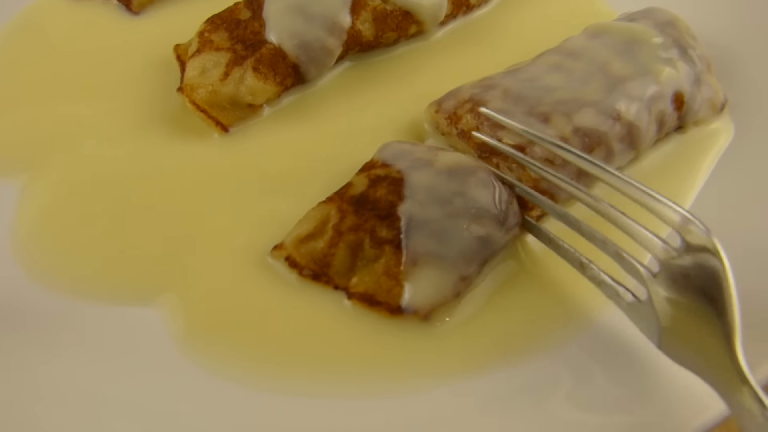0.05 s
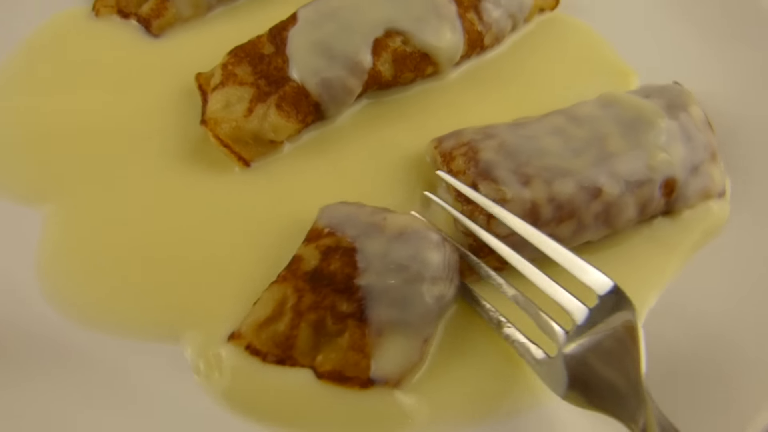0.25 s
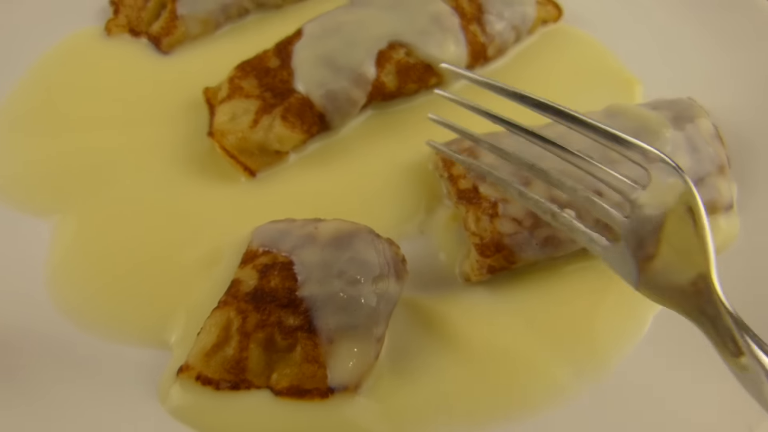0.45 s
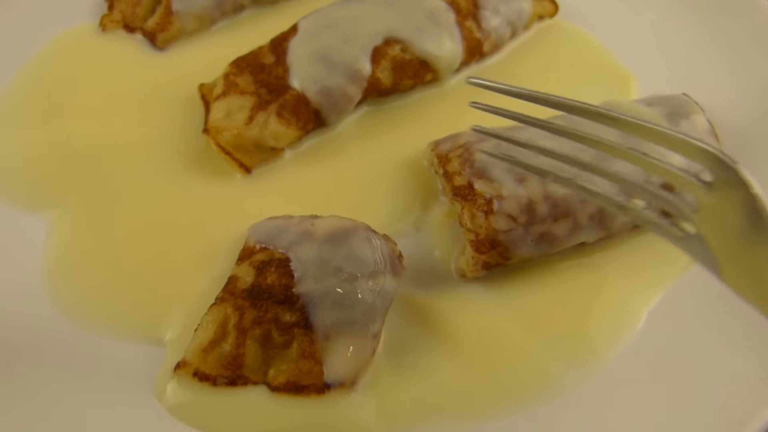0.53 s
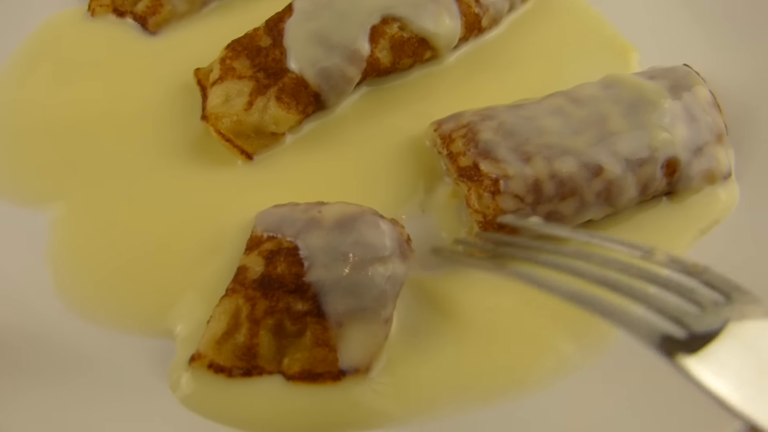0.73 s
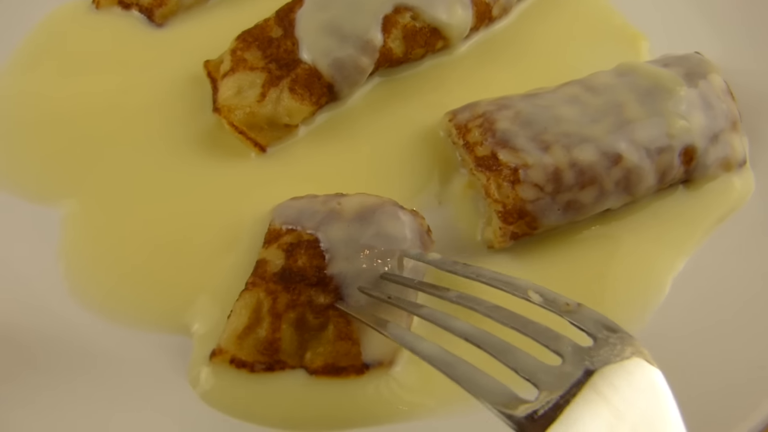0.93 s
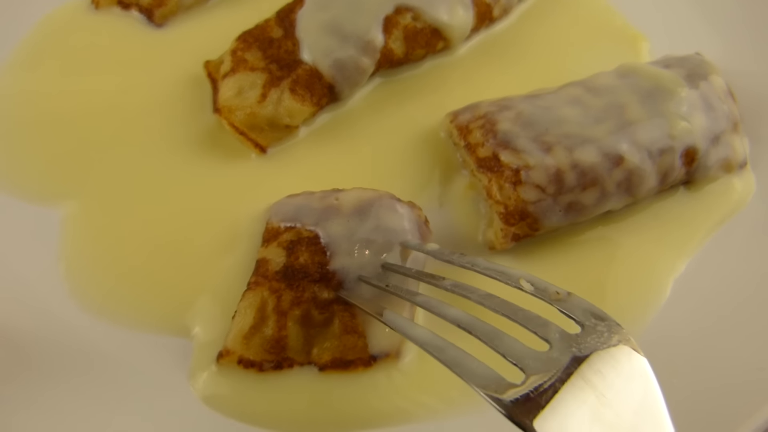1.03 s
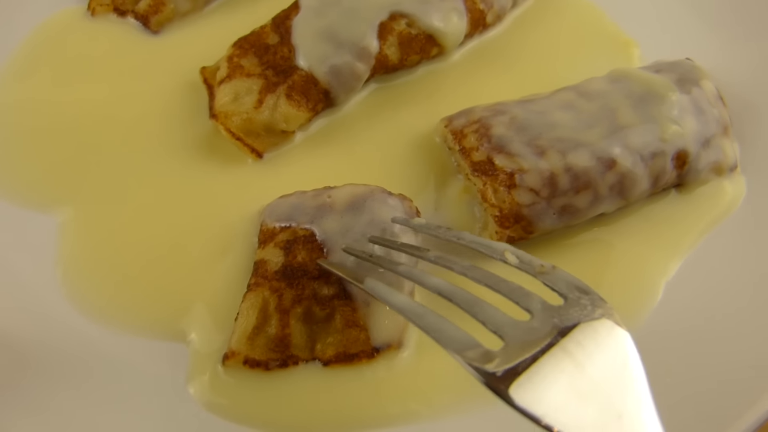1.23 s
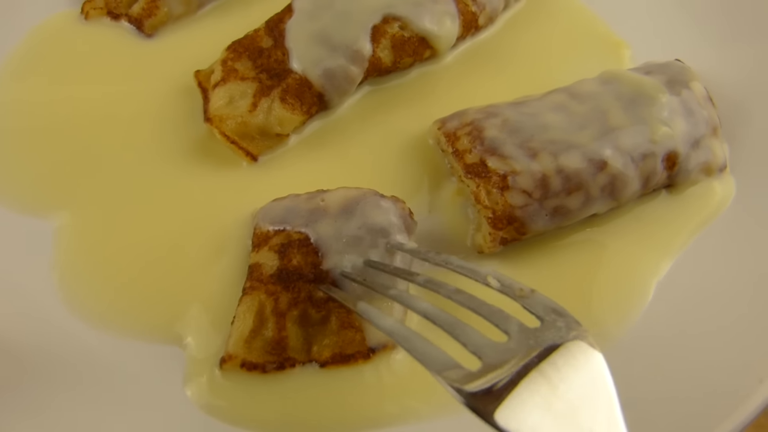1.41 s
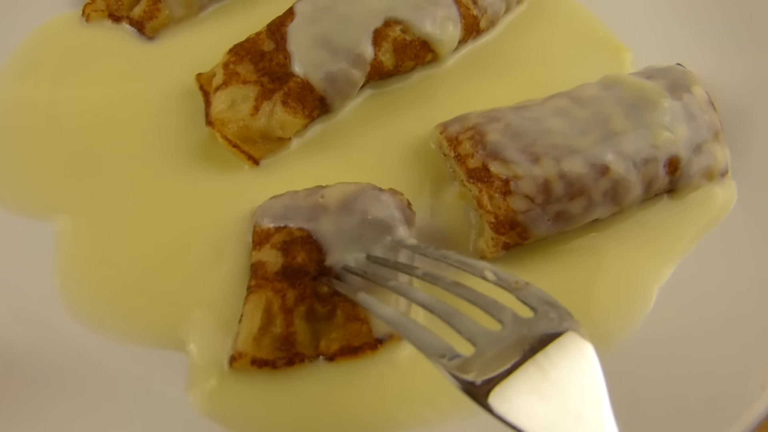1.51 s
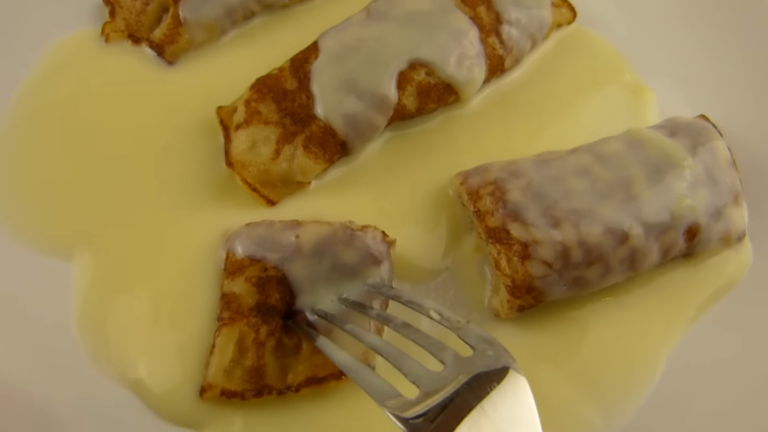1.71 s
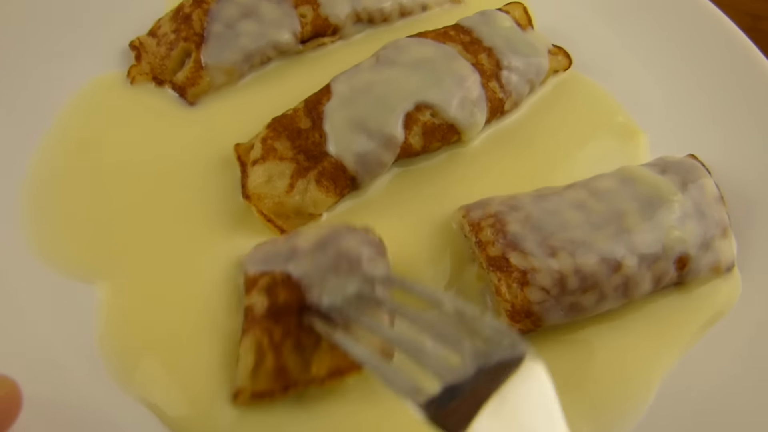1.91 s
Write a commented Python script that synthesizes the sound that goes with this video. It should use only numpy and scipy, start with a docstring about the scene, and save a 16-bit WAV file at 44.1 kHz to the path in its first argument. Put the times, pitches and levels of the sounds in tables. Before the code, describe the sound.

A metal fork clinks once, sharp and bright, on a food-damped china plate, then scrapes softly

```python
"""A metal fork cuts a soft pancake and clinks once on a china plate damped by food and sauce:
cracks of noise and short-lived ringing tones, with a dull knock of plate on table. It scrapes softly
as it lifts: tiny slips and thin squeals. A low hum, there throughout, swells midway and fades. Later the
fork presses into the soft piece with a few tiny wet ticks, short bursts of noise. A small room of
echoes and fading noise rings behind it all, over steady noise and a faint flutter of pips."""
import sys
import numpy as np
from scipy import signal
from scipy.fft import rfft, irfft
from scipy.io import wavfile
from scipy.ndimage import uniform_filter1d

SR = 44100
rng = np.random.default_rng(int(sys.argv[2]) if len(sys.argv) > 2 else 0)


def master(y):
    """Save y as 16-bit WAV."""
    cut = np.clip(np.atleast_2d(y).T, -1, 1)
    pcm = np.round(cut * 32767)  # scale
    wavfile.write(sys.argv[1], SR, pcm.astype(np.int16))


N = 85995  # length in samples


def amp(db):
    """Turns decibels into gain."""
    return 10 ** (np.asarray(db) / 20)


def unit(x):
    """Scales a sound to an average (rms) level of 1."""
    return x / np.sqrt(np.mean(x ** 2) + 1e-20)


def read(points, hz):
    """Reads a table between its points, on a log-frequency axis."""
    f, value = np.transpose(points)
    return np.interp(np.log(hz + 1), np.log(f + 1), value)


def add(mix, start_s, sound):
    """Mixes a sound in at a time, cutting off what runs past the end."""
    start = max(round(start_s * SR), 0)
    part = mix[..., start:][..., :sound.shape[-1]]
    part += sound[..., :part.shape[-1]]


def colour(x, points):
    """Gives a sound the tabled spectrum, with a filter of unit energy that never acts early."""
    size = 4096
    log_gain = np.log(amp(read(points, abs(np.fft.fftfreq(size, 1 / SR)))))
    # minimum phase: the filter's energy comes as early as it can
    spectrum = np.exp(np.conj(signal.hilbert(log_gain)))
    taps = np.fft.ifft(spectrum).real[:size // 2]
    return signal.fftconvolve(x, taps / np.linalg.norm(taps))[:len(x)]


def band_noise(hz, octaves):
    """Makes noise in a bell-shaped band around a centre pitch."""
    f = np.fft.rfftfreq(N, 1 / SR)
    bell = np.exp(-.5 * (np.log2((f + 1) / hz) / octaves) ** 2)
    return unit(irfft(rfft(rng.standard_normal(N)) * bell, N))


def dying(t60):
    """Fades exponentially, by 60 dB in t60 seconds."""
    return np.exp(-np.log(1000) * np.arange(N) / SR / t60)


def pair(a, b, likeness):
    """Makes two channels of the given likeness from two unrelated signals."""
    c = np.clip(likeness, -1, 1)
    mid = np.sqrt((1 + c) / 2) * a
    side = np.sqrt((1 - c) / 2) * b
    return np.array([mid + side, mid - side])


# how alike left and right are in scattered sound: pitch_hz, likeness (0 unrelated, 1 the same)
SCATTER_LIKENESS = [(200, 0.018), (700, 0.9), (1500, 0.25), (3000, 0.31), (5000, 0.87), (12000, .85)]


def scattered(size):
    """Makes stereo noise whose left-right likeness depends on pitch."""
    z = rfft(rng.standard_normal((2, size)))
    return irfft(pair(*z, read(SCATTER_LIKENESS, np.fft.rfftfreq(size, 1 / SR))), size)


RADIATE_HZ = 350.8  # the plate sends out little sound below this


def radiate(x):
    """Thins out the lows that the plate sends out poorly."""
    return signal.sosfilt(signal.butter(2, RADIATE_HZ, "high", fs=SR, output="sos"), x)


# plate and fork ringing together: pitch_hz, level_db (relative to the blow), t60_s
RINGING_TONES = [(1080, -26, .055), (1210, -23, .035), (1720, -21, .028), (1927, -34, .1),
                 (2520, -24, .033), (3537, -22.5, .115), (4050, -29, .07), (4545, -12.5, .07),
                 (4960, -19, .04), (5340, -7, .015), (5583, -11, .07), (6710, -13.5, .075),
                 (6912, -18, .06), (7885, -18, .052), (9245, -12, .03), (10615, -17, .05),
                 (12100, -23, .033)]
# tines landing on the plate: start_s, level_db
TINE_BLOWS = [(.2180, -4.5), (0.2186, -3)]
# colour of the contact noise: pitch_hz, level_db (relative)
CRACK_COLOUR = [(40, -54), (150, -27.5), (350, -17), (700, -7.5), (1200, -3.5), (1700, -0.5), (2200, -7.5),
                (3000, -5.5), (3700, 1.5), (4400, -5), (5500, 6.5), (6300, -2), (7300, -15.5), (8100, 1.5),
                (9700, -2), (11500, -12.5), (15500, -22.5)]
CRACK_DB, CRACK_T60_S = -6.5, 0.02  # level relative to the blow
PHASE_SPREAD_TURNS = 0.039  # left-right offset of each ringing tone, in cycles


def clink():
    """Tines crack against the china, and the hardest one rings the plate in many damped tones."""
    t = np.arange(N) / SR
    out = np.zeros((2, N))
    for start_s, level_db in TINE_BLOWS:
        burst = scattered(N) * dying(CRACK_T60_S)
        crack = np.array([colour(side, CRACK_COLOUR) for side in burst])
        add(out, start_s, amp(level_db + CRACK_DB) * crack)

    start_s, blow_db = TINE_BLOWS[-1]  # the hardest blow
    for hz, level_db, t60 in RINGING_TONES:
        offset = PHASE_SPREAD_TURNS * rng.choice([-1, 1]) * np.array([[.5], [-.5]])
        turns = rng.random() + offset
        tone = dying(t60) * np.sin(2 * np.pi * (hz * t + turns))
        add(out, start_s, amp(blow_db + level_db) * tone)
    return radiate(out)


# plate against the table: pitch_hz, level_db, t60_s
TABLE_KNOCK = [(500, -21, .012), (720, -19, .012)]
KNOCK_PAN_DB, KNOCK_LAG_S = -7.5, .0003  # left compared with right


def knock():
    """The blow pushes the plate against the table: a short dull knock, nearer the right ear."""
    t = np.arange(N) / SR
    push = np.zeros(N)
    for k, (hz, level_db, t60) in enumerate(TABLE_KNOCK):
        # the tones start half a cycle apart
        push += amp(level_db) * dying(t60) * np.sin(2 * np.pi * (hz * t + k / 2))
    push = radiate(push)
    out = np.zeros((2, N))
    start_s = TINE_BLOWS[0][0]
    add(out[0], start_s + KNOCK_LAG_S, amp(KNOCK_PAN_DB / 2) * push)
    add(out[1], start_s, amp(-KNOCK_PAN_DB / 2) * push)
    return out


# tines sliding on the sauced plate:
# middle_s, half_length_s, slip_level_db, squeal_pitch_hz, squeal_level_db
SLIDES = [(0.283, 0.019, -51.5, 4370, -34.5), (0.338, 0.042, -52, 5620, -47),
          (0.353, 0.027, -78, 4530, -45), (0.41, 0.04, -56.5, 4800, -66),
          (0.438, 0.031, -55.5, 5080, -53.5), (0.476, 0.014, -59, 5400, -81)]
# colour of the slips: pitch_hz, level_db (relative)
SLIP_COLOUR = [(200, -29.5), (1000, -2.5), (2200, -2.5), (3200, -2), (5000, -2.5), (7500, 1), (10500, -2.5),
               (12000, -15), (15500, -22)]
SLIPS_PER_S, SQUEAL_WIDTH_HZ = 3300, 270  # average slip rate, nominal squeal width


def scrapes():
    """Dense tiny slips and a thin squeal swell and fade with each slide."""
    t = np.arange(N) / SR
    out = np.zeros(N)
    for middle_s, half_s, slip_db, squeal_hz, squeal_db in SLIDES:
        impulses = rng.standard_normal(N) * (rng.random(N) < SLIPS_PER_S / SR)
        slips = unit(colour(impulses, SLIP_COLOUR))
        squeal = band_noise(squeal_hz, SQUEAL_WIDTH_HZ / squeal_hz / 2)
        stroke = np.cos(np.pi / 2 * np.clip((t - middle_s) / half_s, -1, 1)) ** 2
        out += stroke * (amp(slip_db) * slips + amp(squeal_db) * squeal)
    return np.array([out, out])


# wet ticks as the fork presses in, before their treble is softened:
# start_s, level_db, centre_hz, spread_octaves, t60_s
WET_TICKS = [(1.6637, -46, 5790, 1, 0.0059), (1.6678, -44.5, 7200, 0.92, 0.012),
             (1.6722, -48, 1820, 0.57, 0.018), (1.6815, -62, 5300, 0.046, 0.061),
             (1.682, -54, 2100, 0.42, 0.013), (1.7084, -54, 5330, 0.58, 0.0091),
             (1.7176, -54, 5200, .6, 0.0085), (1.7283, -53.5, 5500, 0.62, 0.021)]
TICK_TOP_HZ = 9100


def ticks():
    """Small films of sauce snap under the tines: bursts of noise with a softened treble."""
    out = np.zeros((2, N))
    for start_s, level_db, hz, octaves, t60 in WET_TICKS:
        add(out, start_s, amp(level_db) * band_noise(hz, octaves) * dying(t60))
    return signal.sosfilt(signal.butter(2, TICK_TOP_HZ, fs=SR, output="sos"), out)


# nearby surfaces: delay_s, gain_db
NEAR_ECHOES = [(.0045, -15.5), (.0098, -17.5)]
# how fast the room dies away: pitch_hz, t60_s
ROOM_DECAY = [(200, .24), (700, 0.51), (1800, .44), (4500, 0.46), (8000, .35), (13000, 0.15)]
TAIL_DELAY_S = .009


def room(x, wet_db):
    """Adds a few near reflections and a diffuse tail whose bands die at their own speed."""
    hz, t, z = signal.stft(scattered(SR), SR, nperseg=256)
    decay = np.exp(-np.log(1000) * t / read(ROOM_DECAY, hz)[:, None])
    tail = signal.istft(z * decay, SR, nperseg=256)[1]
    response = np.zeros((2, SR))
    add(response, TAIL_DELAY_S, amp(wet_db) * tail / np.linalg.norm(tail[0]))
    response[:, 0] += 1  # the direct sound
    for delay_s, gain_db in NEAR_ECHOES:
        scatter = scattered(64) * np.hanning(64)
        add(response, delay_s, amp(gain_db) * scatter / np.linalg.norm(scatter[0]))
    return signal.fftconvolve(x, response, axes=1)[:, :N]


# colour of the room noise: pitch_hz, level_db (per Hz, relative)
AIR_COLOUR = [(15, -42.5), (25, -13), (70, -12), (148, -9.5), (269, -12.5), (299, -7), (392, -13),
              (691, -13), (1390, -16.5), (1640, -15.5), (2150, -22), (9990, -22), (15800, -32.5)]
# stereo width of the room noise: pitch_hz, side_over_middle_db
AIR_SIDES = [(50, -9), (150, -0.5), (300, 7), (550, 10.5), (1000, 6), (1700, 2.5), (2700, 1), (4500, -2.5),
             (5400, 3.5), (6000, -16), (9000, -29)]
AIR_DB, AIR_PATCH_DB = -65.5, .7  # level of the middle, size of the slight unevenness


def air():
    """Steady room noise, very wide in the low middle, under centred hiss."""
    hz = np.fft.rfftfreq(1024, 1 / SR)
    a, b, c, d, patches = rng.standard_normal((N // 256 + 5, 513, 5)).T
    # smooth the unevenness over pitch, then over time
    patches = uniform_filter1d(patches, size=12, axis=0)
    patches = unit(uniform_filter1d(patches, size=14, axis=1))
    gain = amp(read(AIR_COLOUR, hz)[:, None] + AIR_PATCH_DB * patches)
    side_gain = amp(read(AIR_SIDES, hz)[:, None])
    z = np.array([a + 1j * b, (c + 1j * d) * side_gain]) * gain
    mid, side = signal.istft(z, nperseg=1024, noverlap=768)[1][:, :N]
    return amp(AIR_DB) * np.array([mid + side, mid - side]) / mid.std()


# level of the hum over time: time_s, level_db
HUM_LEVEL = [(0, -74.5), (.55, -80.5), (.8, -84), (.88, -71.5), (1.02, -71), (1.28, -72.5), (1.45, -83),
             (1.95, -86.5)]
HUM_HZ, HUM_WAVER_HZ = 302, 4  # middle pitch, typical drift


def hum():
    """A faint low tone wavers in pitch, swells and fades."""
    t = np.arange(N) / SR
    waver = unit(uniform_filter1d(rng.standard_normal(N), size=1500))
    cycles = np.cumsum(HUM_HZ + HUM_WAVER_HZ * waver) / SR
    level_db = np.interp(t, *np.transpose(HUM_LEVEL))
    return amp(level_db) * unit(np.sin(2 * np.pi * cycles))


FLUTTER_HZ, FLUTTER_GAP_S, FLUTTER_LENGTH_S = 1625, 0.023, .014  # pitch and gap vary around these
FLUTTER_DB, FLUTTER_SPREAD_DB = -67.5, 4.5  # middle level, random spread


def flutter():
    """Very faint short pips come at uneven intervals, each with its own pitch, level and side."""
    t = np.arange(0, FLUTTER_LENGTH_S, 1 / SR)
    out = np.zeros((2, N))
    for k, (late, size, detune, pan_db) in enumerate(rng.standard_normal((100, 4))):
        hz = FLUTTER_HZ * (1 + 0.025 * detune)
        pip = np.hanning(len(t)) * np.sin(2 * np.pi * hz * t)
        level_db = FLUTTER_DB + FLUTTER_SPREAD_DB * min(size, 1)
        sides_db = pan_db * np.array([[1], [-1]])
        add(out, (k + 0.15 * late) * FLUTTER_GAP_S, amp(level_db + sides_db) * pip)
    return out


def scene():
    """Puts fork and plate in the room, over the quiet background."""
    hit = room(clink(), wet_db=-11.5) + room(knock(), wet_db=-25)
    touches = room(scrapes(), wet_db=-12) + room(ticks(), wet_db=-7)
    return hit + touches + air() + hum() + flutter()


def record(dry):
    """Applies the recorder's band limit: little passes above 15900 Hz."""
    taps = signal.firwin(511, 15900, window=("kaiser", 9), fs=SR)
    return signal.oaconvolve(dry, taps[None], "same")


dry = scene()
out = record(dry)
master(out)
```